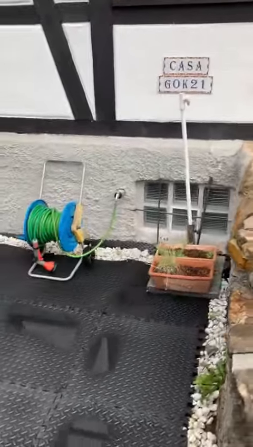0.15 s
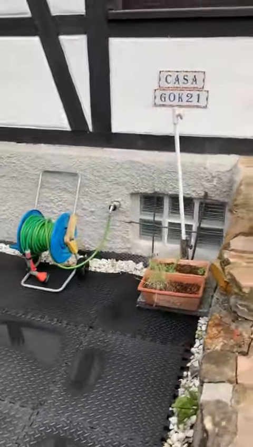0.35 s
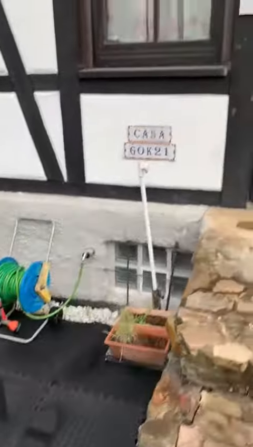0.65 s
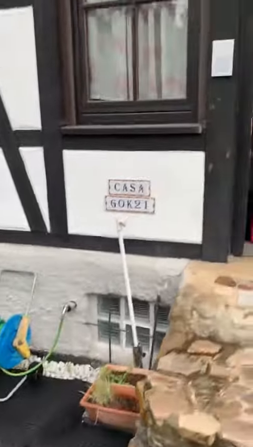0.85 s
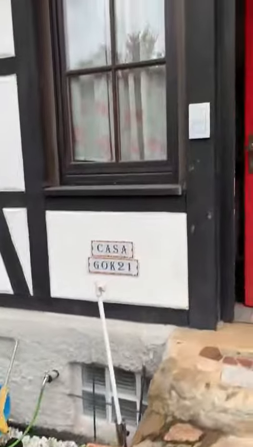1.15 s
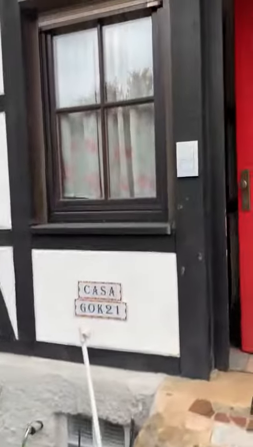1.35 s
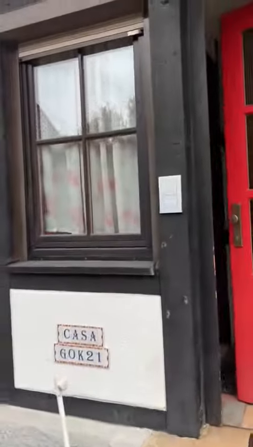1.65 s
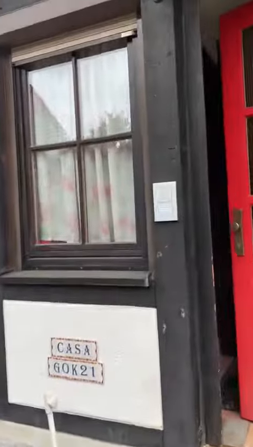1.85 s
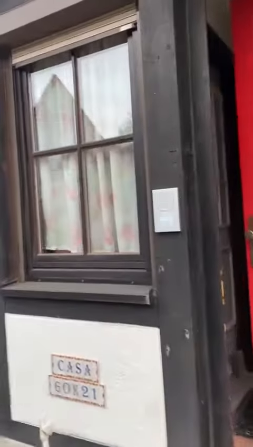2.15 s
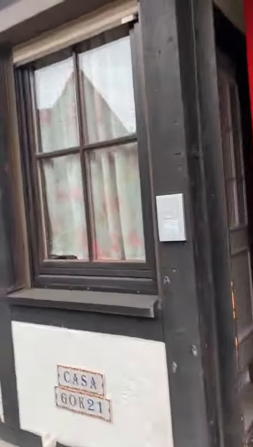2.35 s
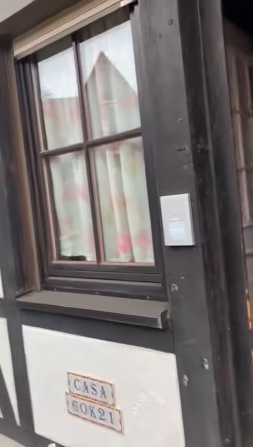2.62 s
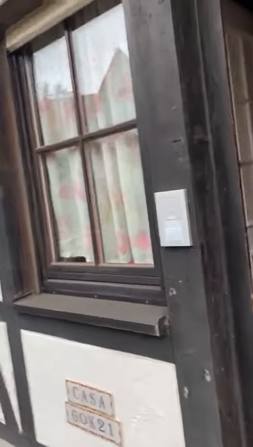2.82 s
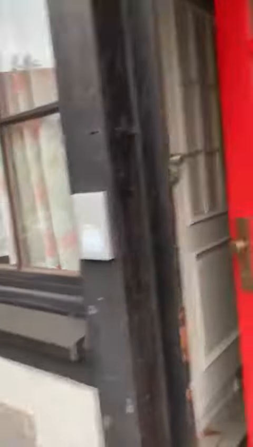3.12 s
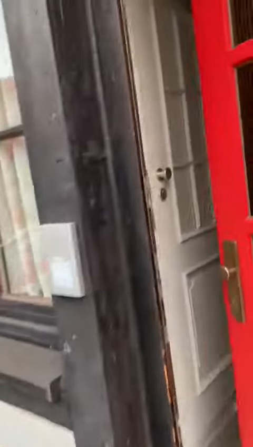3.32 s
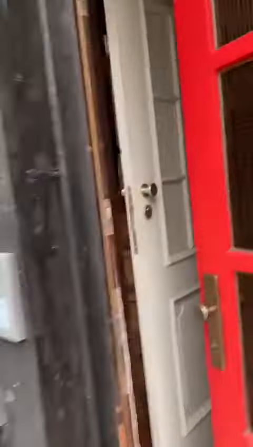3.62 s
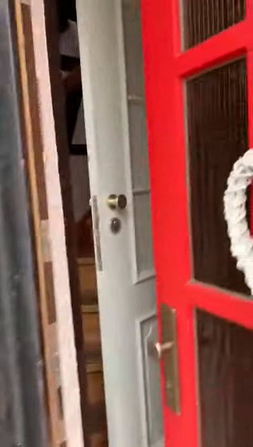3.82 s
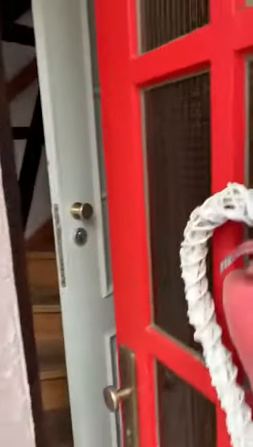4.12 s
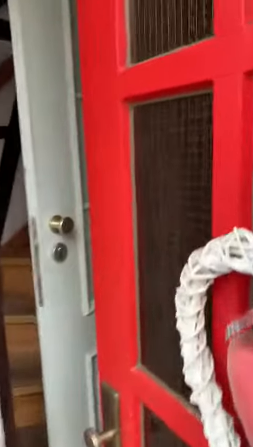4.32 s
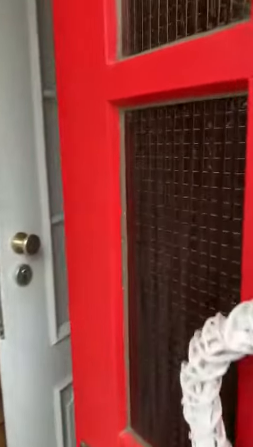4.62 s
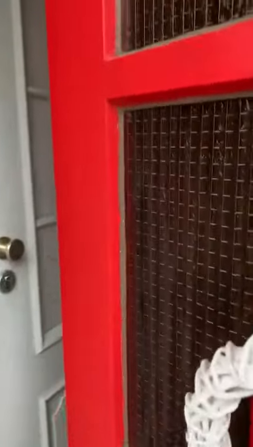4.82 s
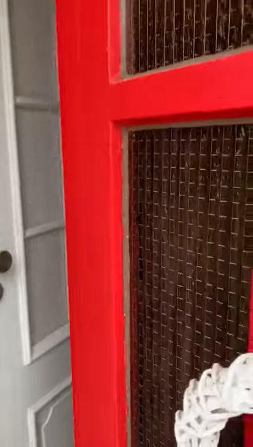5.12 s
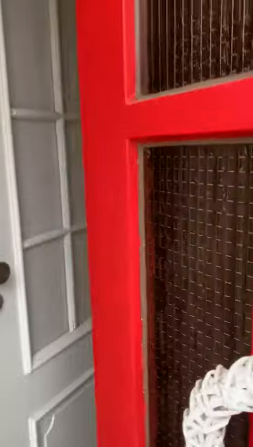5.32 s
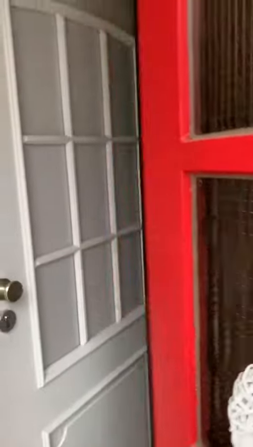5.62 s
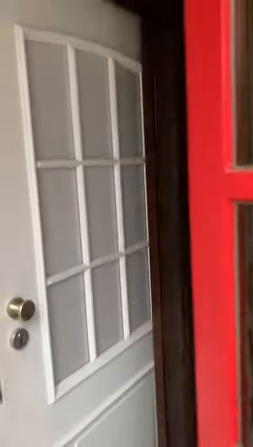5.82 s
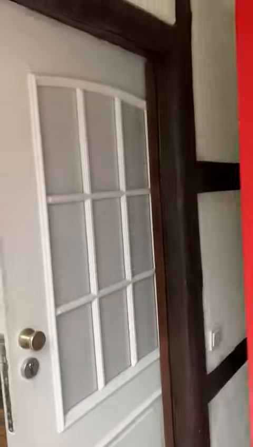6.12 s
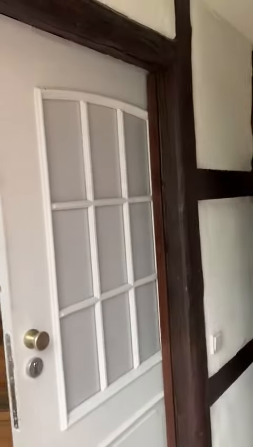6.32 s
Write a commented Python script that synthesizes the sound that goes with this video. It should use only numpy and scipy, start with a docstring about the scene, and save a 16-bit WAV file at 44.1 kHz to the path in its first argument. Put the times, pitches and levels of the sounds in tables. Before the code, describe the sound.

Soft scuffing steps and regular sparrow chirps over distant rumble, a hard metal-and-wood latch clatter, then one crisp knock on an inner door.

```python
"""A latch clacks on an outer house door and a fitting knocks on an inner one: impacts excite damped modes.
Someone carries a phone up stone steps; shoes scuff as gritty friction noise, and dry snaps ring briefly.
A sparrow chirps across the yard as fluttering tones with wall echoes; coloured noise gives distant rumble.
The two microphone ports sit a few centimetres apart, so the upper middle arrives out of phase."""
import sys
import numpy as np
from scipy import signal
from scipy.fft import rfft, irfft, next_fast_len
from scipy.io import wavfile
from scipy.ndimage import uniform_filter1d

SR = 44100
rng = np.random.default_rng(int(sys.argv[2]) if len(sys.argv) > 2 else 0)


def dump_mix(stems):
    """Bounce the given channels to the path in sys.argv[1] as a 16-bit WAV at rate SR."""
    frames = np.atleast_2d(stems).T  # one column per channel
    limited = np.clip(frames, -1, 1)  # hard clip at full scale
    pcm = np.round(limited * 32767).astype(np.int16)
    wavfile.write(sys.argv[1], SR, pcm)


N = 284892

# distant rumble and air, spectral shape shared by the ports: f/Hz, relative density level/dB
YARD_SHARED = [(18, -33), (30, -11.5), (53, 4), (76, 0), (200, -13), (536, -25.5), (1540, -29.5),
               (2410, -41), (3200, -39.5), (4080, -35.5), (5200, -42.5), (6200, -44.5), (10300, -48),
               (11000, -58), (11500, -72), (12500, -80), (22000, -120)]
# the same, opposed between the ports: f/Hz, relative density level/dB
YARD_OPPOSED = [(18, -48), (30, -16.5), (86, 4.5), (781, -2.5), (1420, -6), (5660, -16), (6410, -19),
                (7090, -44), (9820, -46), (10900, -21), (12000, -38), (15600, -62.5), (22000, -120)]
YARD_SHARED_DB, YARD_OPPOSED_DB = -55, -66  # before the swells
# swell of the background: t/s, deep rumble level/dB, rumble level/dB, air level/dB
YARD_SWELL = [(0, 0, -1, 7), (.45, -3, -1, 2.1), (1.6, -4, .6, 0), (2.1, 6, -.6, 1.5), (2.55, -1, 0, .6),
              (3.1, 2.1, 3, 3.5), (3.8, -1.5, 0, 1.5), (4.2, 6, 2.5, 3.5), (5.2, -2, 3.5, 0),
              (6, -1, 5.5, 5), (6.46, -3, 3, .6)]
GUST_DB, GUST_SPREAD_DB = 3, 3  # wind on the ports comes and goes

# shoes and clothes: t/s, hiss level/dB, grit level/dB, nominal grit f/Hz, hold t/s, t60/s
SCUFFS = [(.083, -75, -45, 1910, 0, .0475), (.1, -88, -54, 1760, 0, .19), (.125, -80, -57, 4200, .03, .12),
          (.225, -67, -69, 2020, .03, .1), (.52, -85, -64, 4300, .05, .15),
          (.685, -72.5, -65, 2620, 0, .11), (1.04, -67, -62, 3500, .015, .078),
          (1.224, -68.5, -70, 2000, 0, .22), (2.235, -73, -67, 1900, 0, .14),
          (2.487, -90, -56, 300, 0, .05), (2.85, -68, -66, 1990, 0, .11), (3.12, -64, -63, 2400, .062, .04),
          (3.578, -64, -50, 1600, .005, .05), (3.6, -74, -64, 1500, .1, .4),
          (3.63, -90, -62, 800, .03, .06), (3.61, -78, -63, 3700, .06, .3),
          (3.72, -76, -66, 3700, .09, .15), (4.32, -65, -59, 2400, .03, .2),
          (4.72, -57, -58, 2220, .028, .04), (4.805, -61, -62, 3100, .03, .05),
          (4.874, -50, -62, 3000, .002, .02), (4.885, -61, -67, 3000, .012, .04),
          (5.082, -66, -56, 1960, .025, .09), (5.775, -70, -69, 2000, 0, .083),
          (6.175, -62, -59, 2400, .01, .12)]
SCUFF_RISE_SHARE, SCUFF_RISE_MAX_S = .17, .035  # rise as a share of the decay
THUD_UNDER_GRIT_DB, GRIT_GRAIN_DB = -5, 3

# dry snaps of grit and of fingers on the case: t/s, treble level/dB, middle level/dB
SNAPS = [(.0835, -60, -40), (2.4869, -47.5, -39.5), (3.1104, -38, -40), (3.345, -69, -52),
         (3.577, -55, -47), (3.877, -56, -62), (4.8726, -42, -54)]
SNAP_BASS_DB, SNAP_OPPOSED = -4, .3  # bass against the middle; power share opposed between the ports

# sparrow: t/s, length factor, lead-in root f/Hz, lead-in level/dB,
# then f/Hz and level/dB at the top, the shelf, the fall and the end of the warble
CHIRPS = [(.288, 1, 2880, -64, 4600, -55, 4000, -55, 3600, -50, 3300, -56),
          (1.203, 1.05, 2950, -61, 4450, -47, 4300, -46, 3950, -51, 3200, -53),
          (2.084, 1, 2900, -60, 4750, -51, 3950, -50, 3800, -51, 3150, -55),
          (2.79, 1.05, 2870, -62, 4600, -56, 3900, -53, 3700, -51, 3400, -56),
          (3.342, 1, 2850, -64, 4450, -56, 4100, -58, 3500, -55, 3300, -57),
          (4.139, 1, 2870, -60, 4650, -53, 4050, -49, 3700, -52, 3300, -57),
          (4.8, .9, 2900, -63, 4700, -51, 3950, -54, 3600, -52, 3150, -57),
          (5.412, .95, 2800, -58, 4750, -49, 3950, -49, 3600, -53, 3150, -54),
          (6.028, 1, 2880, -64, 4400, -51, 4150, -56, 3600, -56, 3350, -58)]
# thin lead-in: t/s after the start of the chirp, pitch factor, relative level/dB
LEAD_IN = [(-.036, .96, -14), (-.024, .98, -2), (-.01, 1.01, 0), (.002, 1.04, -4), (.014, 1.03, -10)]
# warble corners before the length factor: t/s at the start, top, shelf, fall, end and silence
WARBLE_CORNERS = [-.01, .011, .023, .044, .068, .084]
# second, lower voice under the warble: t/s after the start, f/Hz, level/dB against the end of the warble
UNDER_VOICE = [(-.008, 3050, -13), (.01, 3200, -12), (.035, 3100, -11), (.06, 3050, -8)]
# house fronts throw the chirp back whole: left delay t/s, right delay t/s, level/dB
BIRD_ECHOES = [(.013, .015, -7), (.031, .028, -11), (.095, .098, -19)]
LEAD_IN_ROOT_DB = -9  # the lead-in's octave is its stronger part
WARBLE_FROM_HZ, WARBLE_FROM_DB, WARBLE_DIES_DB = 3000, -12, -10  # levels against the top and the end
FLUTTER_HZ, FLUTTER_DEPTH = 140, .036  # depth as a share of the pitch
BIRD_LAG_SAMPLES, BIRD_RIGHT_DB = 4, -2  # the right port hears the bird later and softer
BIRD_WALLS_T60_S, BIRD_WALLS_DB = .24, 13.5

# blows on latch and leaf, before the gains of each door: t/s, metal level/dB, crack level/dB, wood level/dB
BLOWS = [(4.411, -33, -48, -45), (4.421, -46, -46, -36), (4.4245, -18, -31, -24), (4.4268, -11, -25, -14),
         (4.431, -19, -32, -18.5), (4.438, -23, -33, -22), (4.443, -23, -36, -28),
         (4.456, -30.5, -39, -29.5), (4.4855, -30, -39, -20), (4.5215, -40, -52, -38),
         (4.542, -41, -56, -47), (4.6885, -59, -52, -38), (4.699, -52, -56, -42), (4.717, -44, -43, -36),
         (4.733, -52, -44, -39), (4.745, -49, -45, -39), (4.752, -70, -58, -36), (5.843, -43, -53, -50.5),
         (5.926, -45, -46, -36), (5.930, -13.5, -28, -19), (5.936, -40, -39, -24), (5.947, -56.5, -44, -24),
         (5.972, -62, -51, -36), (5.996, -50, -48, -27), (6.02, -66, -53, -38), (6.048, -71, -56, -36),
         (6.085, -79, -58, -41.5)]
# the bolt slides before it strikes: t/s, level/dB before the gains of each door
SLIDES = [(4.408, -24), (5.903, -51)]
# modes of the outer wooden leaf: f/Hz, relative level/dB, t60/s
OUTER_WOOD = [(75.5, -9, 0.18), (114.5, -7.5, 0.22), (183, 1, 0.056), (245.4, -2, 0.0583), (317, -5.5, .07),
              (368, -5.5, 0.09), (438, -6, 0.06), (542, -24.5, 0.045), (750, -2, 0.042), (880, -7.5, 0.025),
              (1014, -15, 0.018), (1600, -9.5, 0.012)]
# modes of the inner wooden leaf: f/Hz, relative level/dB, t60/s
INNER_WOOD = [(83.7, -10.5, 0.33), (112, -3.5, 0.12), (147.4, -2.5, 0.049), (244, -3.5, 0.085),
              (325, -9, 0.043), (449, -14, 0.12), (609, -4, 0.035), (740, -4, 0.062), (859, -12, 0.049),
              (999, -8, .06), (1070, -8, 0.021), (1494, -9, 0.037)]
# modes of the latch and handle metal on the outer door: f/Hz, relative level/dB, t60/s
OUTER_METAL = [(3250, -4, .025), (4800, -3, .03), (6415, 7, .035), (6912, -9, .06), (7490, -12, .09),
               (8190, -5, .08), (8515, -6, .09), (8900, -7, .09), (9390, -5, .06), (9730, -7, .07),
               (9950, -3, .05), (10370, -6, .08), (10810, -6, .07), (11200, -3, .05)]
# modes of the fitting on the inner door: f/Hz, relative level/dB, t60/s
INNER_METAL = [(1550, -6, .04), (2850, -3, .03), (4400, -2, .03), (7100, -1, .05), (8000, -2, .05),
               (9300, -2, .05), (10700, -3, .05)]
# lock plate that colours the outer crack: f/Hz, level/dB, t60/s
OUTER_PLATE = [(1600, -24, .015), (1900, -31, .02), (2120, -29, .015), (2650, -26, .012), (3200, -21, .012),
               (4160, -29, .02)]
# lock plate that colours the inner crack: f/Hz, level/dB, t60/s
INNER_PLATE = [(1450, -27, .015), (1950, -27, .015), (2410, -28, .02), (2880, -29, .02), (4000, -30, .02),
               (4450, -26, .015)]
INNER_FROM_S = 5.5  # blows from here on strike the inner door
BLOW_RISE_S, RISE_S_PER_DB = .0006, .00003  # rise at 0 dB of metal; softer blows start more gently
RATTLE_T60_S, RATTLE_S_PER_DB = .013, .0006  # t60 at 0 dB of metal; looser, softer blows rattle longer
PUSH_S_PER_DB = .00002  # a blow with less metal in it is padded and pushes longer
SLIDE_RISE_S, SLIDE_T60_S, SLIDE_CRACK_DB = .009, .035, -17
METAL_GRAIN_DB, CRACK_GRAIN_DB = 2.5, 4.5  # loose parts chatter in uneven grains
BOOM_DB = -3

# a near sound at the ports: f/Hz, phase by which left leads/rad, left minus right level/dB
PORTS = [(0, 0, -.6), (250, -.2, -1.2), (480, -.3, -2), (850, .4, -7), (1400, -.2, -.5), (2000, .6, -3),
         (2700, 2.4, -1), (3600, 1.7, -1), (4300, 2.2, -.5), (4800, 3.1, -.3), (5400, 3.3, .3),
         (6300, 5.2, .2), (7100, 6.1, .1), (9800, 6.5, .1), (11000, 9.0, .5)]


def undb(db):
    """Level definition: decibels to an amplitude ratio."""
    return np.exp(np.asarray(db) * np.log(10) / 20)


def unit(x):
    """Normalisation to a root-mean-square value of 1."""
    return x / np.sqrt(np.mean(x ** 2))


def band(x, lo_hz, hi_hz):
    """Band-pass filtering between two corner frequencies."""
    return signal.sosfilt(signal.butter(2, [lo_hz, hi_hz], "band", fs=SR, output="sos"), x + 1e-18)


def add(track, s, x):
    """Superposition: mix x into the track from time s."""
    i = int(s * SR)
    track[i:i + len(x)] += x[:N - i]


def fade(t60, rise, hold=0):
    """Exponential decay: an envelope rises, holds, then falls 60 dB in t60."""
    t = np.arange(int((rise + hold + t60) * SR)) / SR
    decay_db = -60 * np.maximum(t - rise - hold, 0) / t60
    return np.minimum(t / rise, 1) ** 2 * undb(decay_db)


def grains(size, spread_db):
    """Granular excitation: noise in short pieces of uneven strength."""
    piece = 50  # samples
    strength = undb(spread_db * rng.standard_normal(size // piece + 1))
    return unit(rng.standard_normal(size) * strength.repeat(piece)[:size])


def walk(rate):
    """Slow random modulation: a smoothed random level of spread 1, about rate steps a second."""
    step = 32  # samples between coarse points
    k, count = int(SR / rate / step) + 1, N // step + 2
    stairs = np.repeat(rng.standard_normal(count // k + 1), k)
    coarse = uniform_filter1d(uniform_filter1d(stairs, k), k)[:count]
    return np.interp(np.arange(N) / step, np.arange(count), unit(coarse))


def echoes(x, t60_low, t60_high, delay):
    """Diffuse reverberation: unrelated tails, whose bass and treble decay separately, build up over delay."""
    t = np.arange(SR // 2) / SR
    noise = rng.standard_normal((2, len(t)))
    low = signal.sosfilt(signal.butter(1, 900, fs=SR, output="sos"), noise)
    tail = low * undb(-60 * t / t60_low) + (noise - low) * undb(-60 * t / t60_high)
    tail = tail * np.minimum(t / delay, 1) / np.sqrt(len(t))
    return signal.fftconvolve(x[None], tail, axes=1)[:, :N]


def ports(x):
    """Interaural-type difference: a near sound reaches the two ports with a phase and level gap."""
    size = next_fast_len(N)
    hz, lead, pan_db = np.transpose(PORTS)
    f = np.arange(size // 2 + 1) * SR / size
    # each port takes half the gap
    half = np.exp(.5j * np.interp(f, hz, lead)) * undb(np.interp(f, hz, pan_db) / 2)
    return irfft(rfft(x, size) * np.array([half, 1 / half]), size)[:, :N]


def air(points, deep_db, bass_db, treble_db, flicker_db):
    """Spectral shaping: coloured noise in overlapping half-octave bands that flicker on their own."""
    size = next_fast_len(N)
    f = np.maximum(np.arange(size // 2 + 1) * SR / size, 1)
    hz, db = np.transpose(points)
    colour = undb(np.interp(np.log(f), np.log(hz), db))
    spec = rfft(rng.standard_normal(size)) * colour
    scale, out = np.std(irfft(spec, size)), 0
    swells = [deep_db] * 4 + [bass_db] * 4 + [treble_db] * 12  # bands upward from 20 Hz
    for k, swell_db in enumerate(swells):
        place = 2 * np.log2(f / 20) - k
        share = np.cos(np.pi / 2 * np.clip(place, -1, 1)) ** 2
        level_db = flicker_db * walk(4.96) + 1.66 * walk(22) + swell_db
        out = out + irfft(spec * share, size)[:N] * undb(level_db)
    return out / scale


def shoes():
    """Sliding friction: soles drag on stone as gritty noise in three ranges under one envelope."""
    out = np.zeros(N)
    for s, hiss_db, grit_db, grit_hz, hold, t60 in SCUFFS:
        rise = min(SCUFF_RISE_SHARE * t60, SCUFF_RISE_MAX_S)
        env = fade(t60, rise, hold)
        grit = grains(len(env), GRIT_GRAIN_DB)
        ranges = ((hiss_db, 5800, 11000), (grit_db, grit_hz / 1.6, grit_hz * 1.4),
                  (grit_db + THUD_UNDER_GRIT_DB, 120, 800))
        drag = sum(undb(db) * unit(band(grit, lo, hi)) for db, lo, hi in ranges)
        add(out, s - rise, env * drag)
    return out


def snaps():
    """Impulse response: single clicks ring for a few cycles in each range."""
    out = np.zeros(N)
    click = np.zeros(SR // 20)
    click[0] = 1
    treble = band(click, 4940, 9500)
    middle = band(click, 790, 5000) + undb(5.5) * band(click, 2400, 3300)
    parts = [treble, middle, band(click, 120, 1200)]
    for s, treble_db, middle_db in SNAPS:
        dbs = treble_db, middle_db, middle_db + SNAP_BASS_DB
        add(out, s, sum(undb(db) * part / np.abs(part).max() for db, part in zip(dbs, parts)))
    return np.sqrt(1 - SNAP_OPPOSED) * out, np.sqrt(SNAP_OPPOSED) * out


def note(shape, warble_hz, depth, octave_db):
    """Frequency modulation: one syrinx note with a fast pitch flutter and its octave."""
    s, hz, db = np.transpose(shape)
    t = np.arange(s[0], s[-1], 1 / SR)
    flutter = np.sin(2 * np.pi * (warble_hz * t + rng.random()))
    pitch_hz = np.interp(t, s, hz) * (1 + depth * flutter)
    phase = 2 * np.pi * np.cumsum(pitch_hz) / SR
    level = undb(np.interp(t, s, db)) * signal.windows.tukey(len(t), .15)
    return level * (np.sin(phase) + undb(octave_db) * np.sin(2 * phase))


def sparrow():
    """Reflection and scattering: chirps leap up and fall, broken up by leaves and answered by walls."""
    song = np.zeros(N)
    for s, length, lead_hz, lead_db, *steps in CHIRPS:
        hz, db = steps[::2], steps[1::2]
        warble = np.transpose([np.multiply(WARBLE_CORNERS, length),
                               [WARBLE_FROM_HZ, *hz, hz[-1]],
                               [db[0] + WARBLE_FROM_DB, *db, db[-1] + WARBLE_DIES_DB]])
        lead = note(np.multiply(LEAD_IN, [1, lead_hz, 1]), 170, .015, -LEAD_IN_ROOT_DB)
        under = note(UNDER_VOICE, FLUTTER_HZ, FLUTTER_DEPTH, -37)
        add(song, s + LEAD_IN[0][0], undb(lead_db + LEAD_IN_ROOT_DB) * lead)
        add(song, s + warble[0][0], note(warble, FLUTTER_HZ, FLUTTER_DEPTH, -37))
        add(song, s + UNDER_VOICE[0][0], undb(db[-1]) * under)
    heard = np.array([song, undb(BIRD_RIGHT_DB) * np.roll(song, BIRD_LAG_SAMPLES)])
    for *delays, db in BIRD_ECHOES:
        heard = heard + undb(db) * np.array([np.roll(song, int(d * SR)) for d in delays])
    leaves = [undb(3.5 * walk(60) + 1.5 * walk(250)) for _ in range(2)]
    walls = echoes(band(song, 2600, 6500), BIRD_WALLS_T60_S, BIRD_WALLS_T60_S, .003)
    return heard * leaves + undb(BIRD_WALLS_DB) * walls


def ring(x, modes, swell):
    """Modal superposition: force drives decaying modes of alternating sign that take a moment to radiate."""
    t = np.arange(SR // 2) / SR
    body = sum((-1) ** k * undb(db - 60 * t / t60) * np.sin(2 * np.pi * hz * t)
               for k, (hz, db, t60) in enumerate(modes))
    return signal.fftconvolve(x, body * (1 - np.exp(-t / swell)))[:N]


def door(span, wood, fitting, plate, push_s, ring_db, hiss_from_hz, crack_hz, crack_gain_db, panels_db):
    """Impact excitation: blows rattle metal, crack through the lock plate, push the leaf and shake its panels."""
    rattle, crack, push, thud, buzz = np.zeros((5, N))
    boom = fade(0.097, 0.0027)  # frame and floor shake along, too densely for single modes
    panels = fade(.16, .003)
    for s, db in SLIDES:
        if span[0] <= s < span[1]:
            env = fade(SLIDE_T60_S, SLIDE_RISE_S)
            start = s - SLIDE_RISE_S
            add(rattle, start, undb(db) * env * rng.standard_normal(len(env)))
            add(crack, start, undb(db + SLIDE_CRACK_DB) * env * rng.standard_normal(len(env)))
    for s, metal_db, crack_db, wood_db in BLOWS:
        if span[0] <= s < span[1]:
            env = fade(RATTLE_T60_S - RATTLE_S_PER_DB * metal_db, BLOW_RISE_S - RISE_S_PER_DB * metal_db)
            start = s - BLOW_RISE_S
            shove = np.hanning(int((push_s - PUSH_S_PER_DB * metal_db) * SR) + 3)
            add(rattle, start, undb(metal_db) * env * grains(len(env), METAL_GRAIN_DB))
            add(crack, start, undb(crack_db) * env * grains(len(env), CRACK_GRAIN_DB))
            add(thud, start, undb(wood_db) * boom * rng.standard_normal(len(boom)))
            add(buzz, start, undb(wood_db) * panels * rng.standard_normal(len(panels)))
            add(push, start, undb(wood_db) * shove / shove.sum())
    hiss = band(band(rattle, hiss_from_hz, 14000), hiss_from_hz, 12000)
    metal = undb(ring_db) * ring(rattle, fitting, .0001) + undb(0.1) * hiss
    snap = ring(crack, plate, .0002) + undb(crack_gain_db) * band(crack, *crack_hz)
    leaf = undb(-3.5) * ring(push, wood, 0.001)
    frame = undb(BOOM_DB) * band(band(thud, 83, 900), 60, 860)
    return metal + snap + leaf + frame + undb(panels_db) * band(buzz, 500, 1800)


def scene():
    """Superposition of yard, shoes, snaps, sparrow and doors at the two ports."""
    s, *columns = np.transpose(YARD_SWELL)
    deep_db, bass_db, treble_db = (np.interp(np.arange(N) / SR, s, c) for c in columns)
    wind_db = GUST_DB + GUST_SPREAD_DB * walk(3)
    mid = undb(YARD_SHARED_DB) * air(YARD_SHARED, deep_db, bass_db, treble_db, 2.04)
    side = undb(YARD_OPPOSED_DB) * air(YARD_OPPOSED, wind_db, wind_db, treble_db, 1.2)
    steps = shoes()
    snap_mid, snap_side = snaps()
    bird = sparrow()
    outer = door((0, INNER_FROM_S), OUTER_WOOD, OUTER_METAL, OUTER_PLATE, push_s=.0003, ring_db=-37,
                 hiss_from_hz=5300, crack_hz=(1300, 5000), crack_gain_db=4.5, panels_db=-22)
    inner = door((INNER_FROM_S, N / SR), INNER_WOOD, INNER_METAL, INNER_PLATE, push_s=.0002, ring_db=-49,
                 hiss_from_hz=7000, crack_hz=(1100, 4000), crack_gain_db=5, panels_db=-11)
    # porch and hall answer alike at both ports, except in the middle range
    alike, apart = echoes(outer + undb(1.5) * inner + steps + snap_mid, 0.3, 0.21, .008)
    mid = mid + snap_mid
    side = side + snap_side + undb(-1.5) * band(apart, 400, 3500)
    near = ports(outer + inner + steps + undb(4.5) * alike)
    return near + bird + np.array([mid + side, mid - side])


def record(dry):
    """Low-pass filtering: the phone rolls off and then cuts the top."""
    soft = signal.sosfilt(signal.butter(8, 11500, fs=SR, output="sos"), dry)
    return signal.sosfilt(signal.ellip(10, .2, 80, 11900, fs=SR, output="sos"), soft)


dry = scene()
out = record(dry)
dump_mix(out)
```